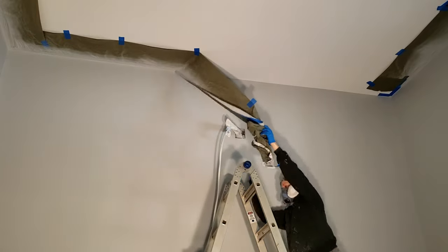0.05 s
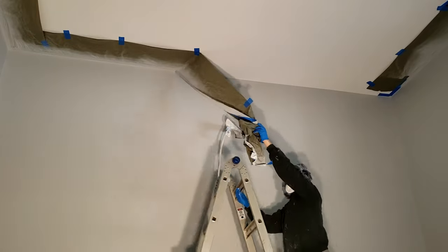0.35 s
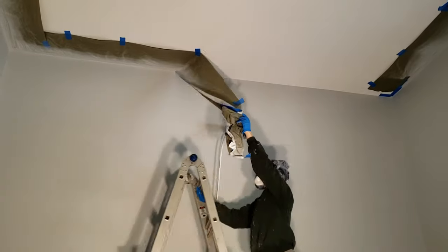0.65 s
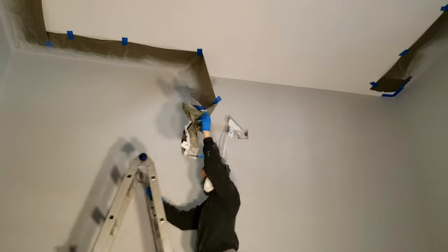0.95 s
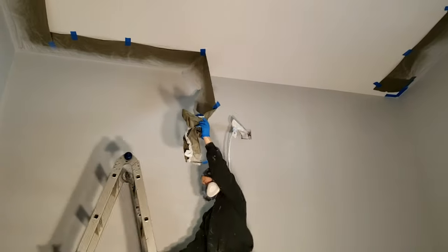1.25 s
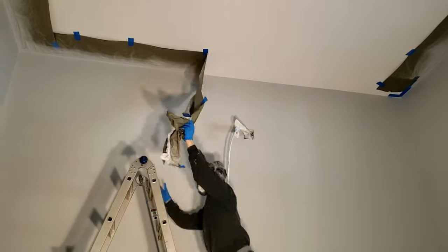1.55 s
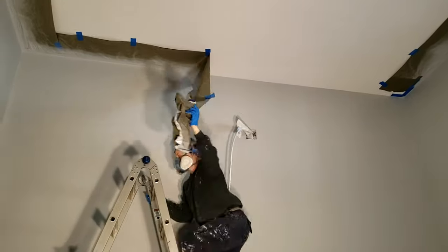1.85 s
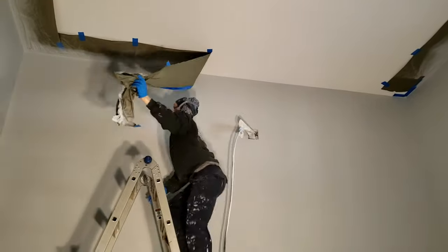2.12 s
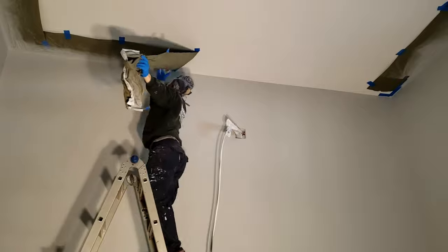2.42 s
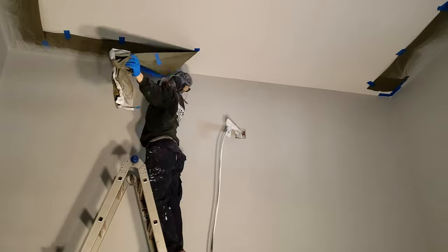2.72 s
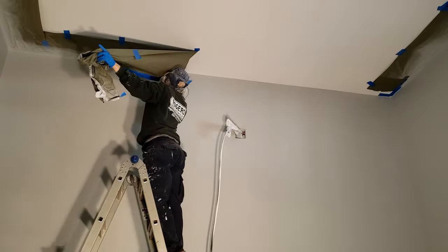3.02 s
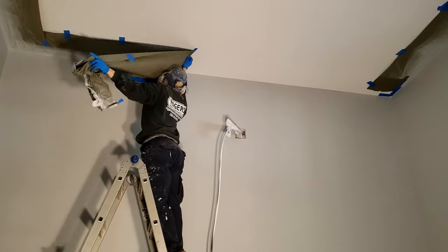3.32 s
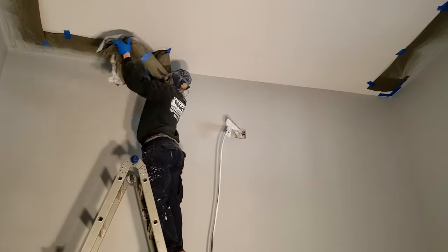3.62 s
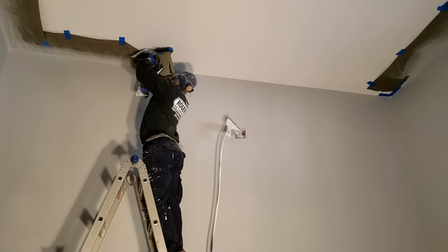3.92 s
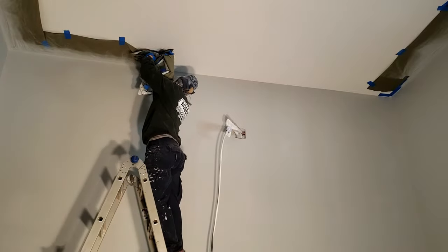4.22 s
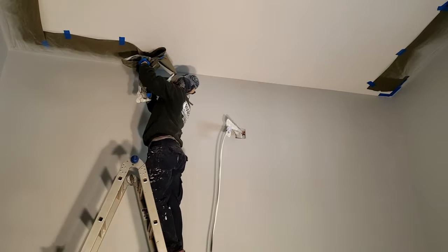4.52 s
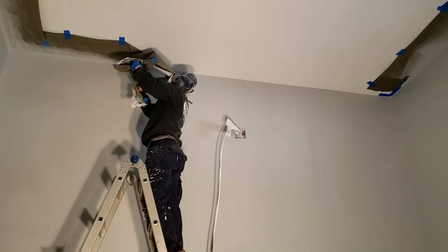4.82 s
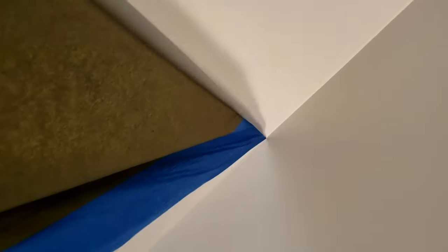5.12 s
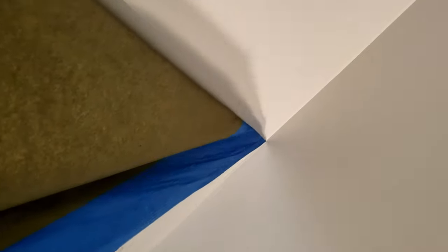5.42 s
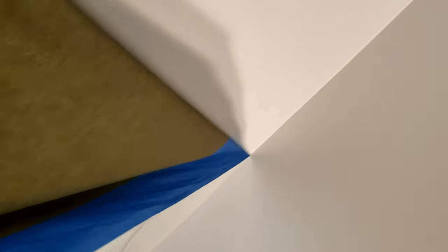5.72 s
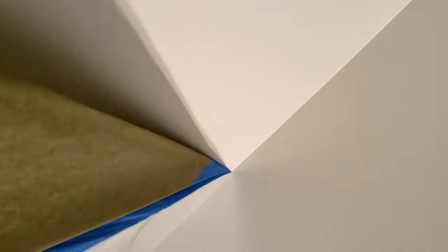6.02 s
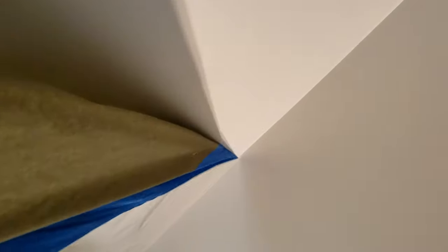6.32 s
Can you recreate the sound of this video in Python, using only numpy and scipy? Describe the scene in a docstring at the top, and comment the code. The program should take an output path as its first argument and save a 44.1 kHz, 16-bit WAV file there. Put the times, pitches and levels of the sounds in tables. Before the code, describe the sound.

Heard from across an empty room, a taped paper sheet is tugged loose with loud rustles, low flaps and quick rips. Softer crumpling follows, along with a few knocks and scuffs of feet climbing a metal stepladder. Then the sound cuts with a click to a close position, where adhesive tape crackles away from the wall in dry, sharp snaps. A very faint low hum comes and goes underneath.

```python
"""Masking paper is pulled off a wall in a bare room: creases give way in bursts, the sheet flaps and buckles.
At 5 s the sound cuts with an abrupt click to a position close to the corner.
There the tape peels and its glue lets go in sharp snaps.
Around 2 s feet knock and scuff up a metal stepladder and rattle its hinge.
The walls echo briefly; a faint low hum comes and goes over the room air."""
import sys
import numpy as np
from scipy import signal
from scipy.fft import rfft, irfft, next_fast_len
from scipy.io import wavfile
from scipy.ndimage import uniform_filter1d

SR = 44100
rng = np.random.default_rng(int(sys.argv[2]) if len(sys.argv) > 2 else 0)


def store_wav(level_fs):
    """Save 16-bit WAV to argv[1]."""
    pcm = np.round(np.clip(np.atleast_2d(level_fs), -1, 1) * 32767)
    wavfile.write(sys.argv[1], SR, pcm.T.astype(np.int16))


N = 284909
T = np.arange(N) / SR
CLOSE_S = 4.989  # close to the corner from here on

# spectra: freq_hz, gain_db
AIR_SPECTRUM = [(20, -6), (80, 2), (200, -23), (700, -7.5), (2000, -11), (7000, -20.5), (16000, -28)]
CRACK_SPECTRUM = [(150, 4), (500, 9), (1100, 12.5), (3500, 4), (6500, -11), (16000, -41)]  # paper cracks, sole scuffs
RIP_SPECTRUM = [(200, -5), (1000, -6), (5000, 1.5), (16000, 8.5)]
RASP_SPECTRUM = [(500, -21.5), (1400, 5), (2600, 7), (8000, -26)]
GLUE_SPECTRUM = [(400, -6), (1800, 2.5), (3500, 1), (7000, -2.5), (11000, 2.5), (16000, -0.5)]
SNAP_SPECTRUM = [(400, -5.5), (1800, -5.5), (7000, -1.5), (11000, -1.5), (16000, 3.5)]
FAR_FLUTTER_SPECTRUM = [(20, -23), (45, -13.5), (80, 4), (120, -11), (170, 0), (280, -6), (420, -23),
                        (900, -51)]
CLOSE_FLUTTER_SPECTRUM = [(20, -26), (60, -1.5), (110, 3.5), (180, 3.5), (350, -3.5), (600, -2),
                          (1200, -31)]
BODY_SPECTRUM = [(150, -38.5), (300, 4.5), (460, 0.5), (800, 6), (1150, -3), (1800, -4), (3000, -13),
                 (7000, -31)]
CRINKLE_SPECTRUM = [(300, -21.5), (1200, 4.5), (2400, 2.5), (4200, 1), (7000, -5), (11000, -11.5),
                    (16000, -5)]
# microphone port responses: freq_hz, left_db, right_db
PORT_RESPONSE = [(24.5, -12, 1), (53.3, 8, 8), (121, -0.5, -4), (363, 2, 0.5), (1210, 2, -4), (3800, 5, -2),
                 (5730, 7, 0), (6880, 9.5, -2), (8050, 0.5, -7.5), (8300, -2.5, -0.5), (10860, 1, 1.5),
                 (12000, 3.5, 2.5), (13800, -1, -5), (15800, -4, -11)]
# room reverberation: freq_hz, t60_s
ROOM_DECAY = [(80, 0.13), (250, 0.1), (700, 0.39), (1500, 0.36), (3500, 0.26), (7000, 0.12), (14000, 0.031)]
# spells of hum: start_s, hold_s, level_db
HUMS = [(1.458, 1.32, -83.5), (2.88, 0.4, -75.5), (3.608, 3.5, -83)]
# feet on the ladder: start_s, thump_db, pitch_hz, scuff_db
FOOTSTEPS = [(1.911, -59, 300, -81), (2.126, -46, 134, -72), (2.21, -52.5, 127, -71),
             (2.351, -56.5, 109, -74), (2.41, -42, 117.4, -54), (2.565, -59.5, 79, -74)]
# ladder metal resonances: freq_hz, gain_db
LADDER_MODES = [(2256, -49), (3295, -51), (5184, -46), (6595, -54), (9846, -53)]
# tape tabs ripping off: peak_s, level_db, half_length_s
TAB_RIPS = [(0.11, -41, 0.012), (0.3, -43, 0.013), (0.806, -35, 0.0075), (3.168, -51, 0.0078),
            (3.48, -49, 0.015), (3.545, -54, 0.014)]
# sharp snaps: start_s, crack_gain_db, ring_gain_db, decay_ms
# 4.9903 s is an abrupt click as the sound cuts to the close position; the others are tape letting go
SHARP_SNAPS = [(2.478, -50, -52, 17), (2.989, -45.5, -36.5, 5.6), (4.9903, -47, -42, 6),
               (5.047, -43, -28, 3.3), (5.088, -37, -26, 2.5), (5.3408, -35, -31, 3.4),
               (5.347, -27.5, -34, 4.9), (5.4058, -32, -50, 2.5), (5.5447, -28.5, -17.5, 1.8),
               (5.551, -34, -36, 6.5), (5.5575, -32, -28, 2), (5.667, -35, -31, 1.6),
               (5.706, -27, -40, 1.7), (5.8075, -21.5, -24, 1.7), (5.812, -21.5, -26, 1.9),
               (5.8362, -24.5, -21, 3.3), (5.8552, -23.5, -32, 3), (5.9064, -23.5, -45, 1.3),
               (5.9413, -21.5, -35, 1.9), (5.9645, -30, -35, 2.6), (5.9836, -34, -41, 2.3),
               (6.09, -35.5, -50, 1.8), (6.2289, -35.5, -41, 2.2), (6.285, -50, -30, 1.6),
               (6.408, -42, -35, 1.8)]
# sheet flapping: peak_s, half_length_s, from_hz, to_hz, level_db, right_lag_ms
SHEET_FLAPS = [(0.119, 0.014, 114.6, 69.6, -38, -2), (0.424, 0.016, 205.3, 284, -32.5, 2.5),
               (0.468, 0.014, 185, 88, -28.5, 0.1), (0.607, 0.013, 142.2, 195, -34.5, 0.5),
               (0.672, 0.018, 136, 195, -30.5, 3.5), (0.749, 0.008, 167, 228, -33, 0.5),
               (0.792, 0.0141, 188.4, 217, -35, 0.5), (1.036, 0.02, 76, 72, -35.5, 5),
               (1.095, 0.018, 156, 215, -33, 2.5), (1.418, 0.012, 103.6, 69.5, -34, 5.5)]
# sheet buckling: start_s, thump_db, pitch_hz, crack_db
SHEET_BUCKLES = [(0.103, -36.5, 147, -45.5), (0.439, -51, 226, -27), (0.521, -30.5, 142, -41),
                 (0.61, -41, 182, -33), (0.812, -24, 149, -32.5), (0.971, -37.5, 294, -46),
                 (1.409, -31, 319, -47), (1.427, -40.5, 217, -44), (1.44, -36, 352, -65),
                 (3.395, -50, 295, -70), (4.336, -70, 320, -39.5), (5.547, -41.5, 401, -40)]
# taut sheet resonances: freq_hz, width_hz, gain_db
SHEET_MODES = [(186, 24, 0.5), (760, 390, -8.5), (1102, 94, 1)]
# floor while the sheet is just held: crinkle_db, body_db, flutter_db
HELD_FLOOR_DB = [-100, -89, -89]
# tugs on the hanging sheet: start_s, rise_s, hold_s, crinkle_db, body_rel_db
SHEET_TUGS = [(0.0, 0.00082, 0.06, -58, -0.5), (0.095, 0.0023, 0.042, -50.5, 1.5),
              (0.283, 0.003, 0.025, -60.5, 5), (0.34, 0.083, 0.034, -53, 8.5),
              (0.405, 0.033, 0.015, -35, -7.5), (0.49, 0.03, 0.033, -46.5, 2),
              (0.604, 0.0053, 0.014, -37.5, -2), (0.63, 0.033, 0.04, -34.5, -2.5),
              (0.725, 0.017, 0.02, -38, -1), (0.775, 0.019, 0.018, -35.5, 0),
              (0.939, 0.017, 0.017, -57.5, -4), (0.968, 0.0037, 0.025, -41, -2.5),
              (1.0, 0.024, 0.065, -38.5, -1), (1.275, 0.071, 0.028, -68, 6), (1.385, 0.02, 0.04, -53, 3.5),
              (1.555, 0.015, 0.029, -70, 6.5), (1.66, 0.013, 0.073, -78.5, -1.5),
              (1.835, 0.017, 0.025, -74, -7.5), (1.905, 0.029, 0.046, -64.5, 1),
              (2.09, 0.059, 0.0077, -61, -3.5)]
# handfuls crumpled: start_s, rise_s, hold_s, crinkle_db, body_rel_db
HANDFULS = [(2.203, 0.0068, 0.019, -57.5, -5.5), (2.27, 0.019, 0.23, -72, -3),
            (2.54, 0.0067, 0.075, -60, -5.5), (2.61, 0.079, 0.014, -54.5, -10.5),
            (2.76, 0.036, 0.25, -67.5, -3.5), (2.92, 0.017, 0.006, -53, -6.5),
            (2.986, 0.002, 0.0067, -58.5, -3), (3.156, 0.0099, 0.095, -58, -7.5),
            (3.3, 0.11, 0.033, -55, -4.5), (3.46, 0.087, 0.039, -48.5, -6.5),
            (3.645, 0.012, 0.088, -52.5, -7), (3.735, 0.0078, 0.061, -52.5, -3),
            (3.825, 0.016, 0.042, -50, -5), (3.935, 0.0033, 0.073, -53, -5),
            (4.02, 0.017, 0.036, -58.5, -4), (4.15, 0.061, 0.021, -70.5, 5.5),
            (4.225, 0.075, 0.027, -58, -3), (4.328, 0.011, 0.03, -63.5, 10),
            (4.37, 0.017, 0.055, -58.5, 4.5), (4.45, 0.054, 0.13, -55.5, -5),
            (4.65, 0.026, 0.21, -61.5, -3), (4.905, 0.011, 0.027, -55.5, -4.5)]
# steady peeling at the corner: time_s, crinkle_rel_db
PEEL_CONTOUR = [(4.99, -56.5), (5.18, -56), (5.27, -63), (5.37, -54), (5.52, -59), (5.56, -54.5),
                (5.68, -55.5), (5.76, -52), (5.82, -47), (5.885, -52.5), (5.97, -45.5), (6.2, -63.5),
                (6.3, -64.5), (6.46, -62.5)]


def undb(db):
    """Decibels to gain."""
    return 10 ** (np.asarray(db) / 20)


def unit(x):
    """Scale to rms 1."""
    return x / np.sqrt(np.mean(x ** 2))


def on_log_axis(hz, points):
    """Interpolate (freq_hz, value) points over log frequency."""
    freq_hz, value = np.transpose(points)
    return np.interp(np.log(hz + 1e-3), np.log(freq_hz), value)


def colour(x, spectrum, size=4096):
    """Minimum-phase filter with the given spectrum."""
    gain = undb(on_log_axis(np.arange(size // 2 + 1) * SR / size, spectrum))
    cepstrum = irfft(np.log(gain))
    cepstrum[1:size // 2] *= 2
    cepstrum[size // 2 + 1:] = 0
    response = irfft(np.exp(rfft(cepstrum)))
    return signal.fftconvolve(np.atleast_2d(x), response[None], axes=1)[:, :N]


def noise(spectrum):
    """Coloured stereo noise, rms 1."""
    return unit(colour(rng.standard_normal((2, N)), spectrum))


def add(track, start_s, sound):
    """Mix a sound into a track."""
    start = max(int(start_s * SR), 0)
    track[start:start + len(sound)] += sound[:N - start]


def stroke(start_s, rise_s, hold_s, fall_db_per_s):
    """Envelope: linear rise, hold, exponential fall."""
    age_s = np.arange(int((rise_s + hold_s + .5) * SR)) / SR
    fall = undb(-fall_db_per_s * np.maximum(age_s - rise_s - hold_s, 0))
    out = np.zeros(N)
    add(out, start_s, np.minimum(age_s / rise_s, 1) * fall)
    return out


def thump(gain_db, pitch_hz, decay_s=0.0075, overtone_ratio=1.71, overtone_db=-9):
    """Short low knock with one inharmonic overtone."""
    t = np.arange(SR // 5) / SR
    phase = 2 * np.pi * pitch_hz * t
    wave = np.sin(phase) + undb(overtone_db) * np.sin(overtone_ratio * phase)
    return 2 * undb(gain_db) * wave * (1 - np.exp(-t / 0.0028)) * np.exp(-t / decay_s)


def crackle(per_s, spread_db, ring_ms, coherence=0):
    """Creases or glue give way at random: short noise bursts of uneven size, at both ports."""
    sizes = undb(spread_db * np.minimum(rng.exponential(size=N), 4.5))
    impulses = (rng.random(N) < per_s / SR) * sizes ** 2 / per_s
    energy = signal.lfilter([1], [1, -np.exp(-2000 / (ring_ms * SR))], impulses)
    common = np.sqrt(coherence) * rng.standard_normal(N)
    separate = np.sqrt(1 - coherence) * rng.standard_normal((2, N))
    return (common + separate) * np.sqrt(energy)


def background(hum_hz=66, rise_s=0.034, fall_db_per_s=315, air_db=-78.5):
    """Room air and spells of low hum."""
    swell = sum(undb(db) * stroke(start_s, rise_s, hold_s, fall_db_per_s) for start_s, hold_s, db in HUMS)
    hum = np.sqrt(2) * swell * np.sin(2 * np.pi * hum_hz * T)
    return hum + undb(air_db) * noise(AIR_SPECTRUM)


def walls(x, wet_db):
    """Add diffuse echo: the room stores each band's energy and lets it decay."""
    size = next_fast_len(N)
    hz = np.arange(size // 2 + 1) * SR / size
    source, echo = rfft(x[0], size), 0
    # noise with the broad colour of the source
    diffuse = rfft(rng.standard_normal((2, size))) * uniform_filter1d(np.abs(source), size=601)
    bands_hz, t60s_s = np.transpose(ROOM_DECAY)
    for t60_s, selector in zip(t60s_s, np.eye(len(bands_hz))):
        band = on_log_axis(hz, list(zip(bands_hz, selector)))
        retained = np.exp(-np.log(1e6) / (t60_s * SR))
        power = irfft(source * band, size)[:N] ** 2
        stored = signal.lfilter([1 - retained], [1, -retained], power)
        echo = echo + np.sqrt(stored) * unit(irfft(diffuse * band, size)[:, :N])
    return (x + undb(wet_db) * echo) / np.sqrt(1 + undb(2 * wet_db))


def footfalls(boom_rel_db=-14, boom_hz=82):
    """Each foot knocks on a rung; the floor booms faintly below."""
    out = np.zeros(N)
    for start_s, thump_db, pitch_hz, _ in FOOTSTEPS:
        add(out, start_s, thump(thump_db, pitch_hz, decay_s=0.015))
        add(out, start_s, thump(thump_db + boom_rel_db, boom_hz, decay_s=0.045))
    return out


def scuffs(rise_s=0.006, decay_s=0.034):
    """The sole scuffs as it lands on the rung."""
    t = np.arange(SR // 3) / SR
    swell = np.zeros(N)
    for start_s, _, _, scuff_db in FOOTSTEPS:
        add(swell, start_s, undb(scuff_db) * (1 - np.exp(-t / rise_s)) * np.exp(-t / decay_s))
    return swell * noise(CRACK_SPECTRUM)


def hinge(q=25):
    """Under the heaviest step the hinge rattles and rings the ladder."""
    rattle = rng.standard_normal((2, N)) * stroke(start_s=2.417, rise_s=0.01, hold_s=0, fall_db_per_s=300)
    return sum(undb(db) * signal.lfilter(*signal.iirpeak(hz, q, fs=SR), rattle)
               for hz, db in LADDER_MODES)


def rips():
    """Tape tabs unzip from the wall in quick swells of bright clicks."""
    swell = sum(undb(db) * np.exp(-.5 * ((T - peak_s) / half_s) ** 2) for peak_s, db, half_s in TAB_RIPS)
    return swell * unit(colour(crackle(per_s=3400, spread_db=0.5, ring_ms=0.65), RIP_SPECTRUM))


def glue_ticks(crinkle_db, rel_db=-9):
    """Close by, single glue threads part, dry and sharp."""
    threads = crackle(per_s=110, spread_db=6.0, ring_ms=0.29, coherence=0.24)
    return (T > CLOSE_S) * undb(crinkle_db + rel_db) * unit(colour(threads, GLUE_SPECTRUM))


def glue_rasp(crinkle_db, rel_db=-4.5):
    """Close by, the glue sticks and slips in a coarse crackle."""
    slips = crackle(per_s=600, spread_db=-0.5, ring_ms=0.54, coherence=0.086)
    return (T > CLOSE_S) * undb(crinkle_db + rel_db) * unit(colour(slips, RASP_SPECTRUM))


def snaps(ring_hz=3000, ring_q=0.82, left_db=-3.5, right_db=-6.0):
    """Crack plus brief ring: glue lets go and flicks the taut strip; also the click at the cut."""
    t = np.arange(SR // 20) / SR
    out = np.zeros((2, N))
    band = signal.iirpeak(ring_hz, ring_q, fs=SR)
    for start_s, crack_db, ring_db, decay_ms in SHARP_SNAPS:
        for port, port_db in zip(out, (left_db, right_db)):
            burst = undb(port_db) * rng.standard_normal(len(t)) * np.exp(-1000 * t / decay_ms)
            ring = signal.lfilter(*band, signal.lfilter(*band, burst))
            add(port, start_s, undb(crack_db) * burst + undb(ring_db) * ring)
    return colour(out, SNAP_SPECTRUM)


def flaps(waver=0.032):
    """Short low whoops that glide as the sheet tightens or slackens."""
    out = np.zeros((2, N))
    for peak_s, half_s, from_hz, to_hz, level_db, right_lag_ms in SHEET_FLAPS:
        sigmas = np.linspace(-3, 3, int(6 * half_s * SR))
        jitter = np.interp(sigmas, np.arange(-3, 4), rng.standard_normal(7))
        pitch_hz = np.interp(sigmas, [-1, 1], [from_hz, to_hz]) * (1 + waver * jitter)
        phase = 2 * np.pi * (np.cumsum(pitch_hz) / SR + rng.random())
        whoop = undb(level_db) * np.exp(-.5 * sigmas ** 2) * np.sin(phase)
        start_s = peak_s - len(sigmas) / SR / 2
        add(out[0], start_s, whoop)
        add(out[1], start_s + right_lag_ms / 1000, whoop)
    return out


def buckles(rise_s=0.0033, decay_s=0.023, right_lead_ms=0.77):
    """The sheet flips over: low thump, papery crack."""
    t = np.arange(SR // 5) / SR
    thumps, cracks = np.zeros(N), np.zeros(N)
    for start_s, thump_db, pitch_hz, crack_db in SHEET_BUCKLES:
        add(thumps, start_s, thump(thump_db, pitch_hz))
        add(cracks, start_s, undb(crack_db) * (1 - np.exp(-t / rise_s)) * np.exp(-t / decay_s))
    right_thumps = np.interp(T + right_lead_ms / 1000, T, thumps)
    return np.array([thumps, right_thumps]) + cracks * noise(CRACK_SPECTRUM)


def flutter(level_db):
    """The loose sheet pushes air in low puffs, nearly alike at both ports when close."""
    far = colour(crackle(per_s=350, spread_db=1.2, ring_ms=6, coherence=.2), FAR_FLUTTER_SPECTRUM)
    close = colour(crackle(per_s=900, spread_db=.6, ring_ms=5, coherence=.85), CLOSE_FLUTTER_SPECTRUM)
    return undb(level_db) * np.where(T > CLOSE_S, unit(close), unit(far))


def hollow_ring(crinkle_db, body_db, rel_db=-0.5, taut_db=-34):
    """Pulled taut, the sheet rings like a drum skin."""
    bends = crackle(per_s=3000, spread_db=-2.0, ring_ms=0.43)
    ring = sum(undb(db) * signal.lfilter(*signal.iirpeak(hz, hz / width_hz, fs=SR), bends)
               for hz, width_hz, db in SHEET_MODES)
    slack_db = 1.7 * np.minimum(crinkle_db - taut_db, 0)
    return unit(ring) * undb(body_db + rel_db + slack_db)


def folds(x, patch_db=2.5, pull_db=1.27):
    """The sheet keeps changing shape: its resonances shift and the pull wavers."""
    bins = signal.stft(x, nperseg=512)[2]
    patches = uniform_filter1d(rng.standard_normal(bins.shape[1:]), size=2, axis=0)
    patches = unit(uniform_filter1d(patches, size=9, axis=1))
    pull = unit(uniform_filter1d(rng.standard_normal(bins.shape[2]), size=5))
    gain = unit(undb(patch_db * patches + pull_db * pull))
    return signal.istft(bins * gain, nperseg=512)[1][:, :N]


def movement_power(moves, fall_db_per_s, flutter_rel_db, sway_fall_db_per_s=263):
    """Power of crinkle, body and flutter; the flutter follows the body and lasts longer."""
    power = np.zeros((3, N))
    for start_s, rise_s, hold_s, crinkle_db, body_rel_db in moves:
        grip = undb(crinkle_db) * stroke(start_s, rise_s, hold_s, fall_db_per_s)
        sway = undb(crinkle_db) * stroke(start_s, rise_s, hold_s, sway_fall_db_per_s)
        power += np.array([grip, grip * undb(body_rel_db), sway * undb(body_rel_db + flutter_rel_db)]) ** 2
    return power


def handling(peel_gain_db=1.5, peel_body_rel_db=-5.5, peel_flutter_rel_db=-3.0):
    """Crinkle, body and flutter in dB: the sheet is tugged, gathered up, then peeled close by."""
    held = undb(HELD_FLOOR_DB)[:, None] ** 2
    tugged = movement_power(SHEET_TUGS, fall_db_per_s=309, flutter_rel_db=0)
    gathered = movement_power(HANDFULS, fall_db_per_s=268, flutter_rel_db=-8)
    peel_db = np.interp(T, *np.transpose(PEEL_CONTOUR)) + peel_gain_db
    close_db = peel_db + np.array([[0], [peel_body_rel_db], [peel_flutter_rel_db]])
    return np.where(T > CLOSE_S, close_db, 10 * np.log10(held + tugged + gathered))


def paper(crinkle_db, body_rel_db, fizz_gain_db=-8):
    """Harder pulls break more creases; a broad sheet gives body, a narrow strip more glue fizz."""
    per_s = 3000 * undb(0.23 * (crinkle_db + 46.5))
    crinkle = unit(colour(crackle(per_s, spread_db=-1.0, ring_ms=1.0), CRINKLE_SPECTRUM))
    body = unit(colour(crackle(per_s, spread_db=2.0, ring_ms=0.53), BODY_SPECTRUM))
    fizz = unit(colour(crackle(per_s, spread_db=1.5, ring_ms=.5), GLUE_SPECTRUM))
    mix = crinkle + body * undb(body_rel_db + 0.03) + fizz * undb(fizz_gain_db - body_rel_db)
    return mix * undb(crinkle_db)


def scene():
    """Sheet, buckles, scuffs and rips echo off the walls; the rest arrives direct."""
    crinkle_db, body_db, flutter_db = handling()
    creases = paper(crinkle_db, body_db - crinkle_db)
    sheet = folds(creases + hollow_ring(crinkle_db, body_db) + flutter(flutter_db))
    direct = flaps() + footfalls() + hinge() + snaps() + glue_ticks(crinkle_db) + glue_rasp(crinkle_db)
    return walls(sheet + buckles() + scuffs() + rips(), wet_db=-2.0) + direct + background()


def record(dry, cutoff_hz=16000):
    """Each microphone port adds its own colour; the top is cut."""
    ports = np.array(PORT_RESPONSE)
    heard = np.vstack([colour(dry[c], ports[:, [0, c + 1]]) for c in range(2)])
    return signal.sosfilt(signal.ellip(10, .2, 70, cutoff_hz, fs=SR, output="sos"), heard)


dry = scene()
out = record(dry)
store_wav(out)
```